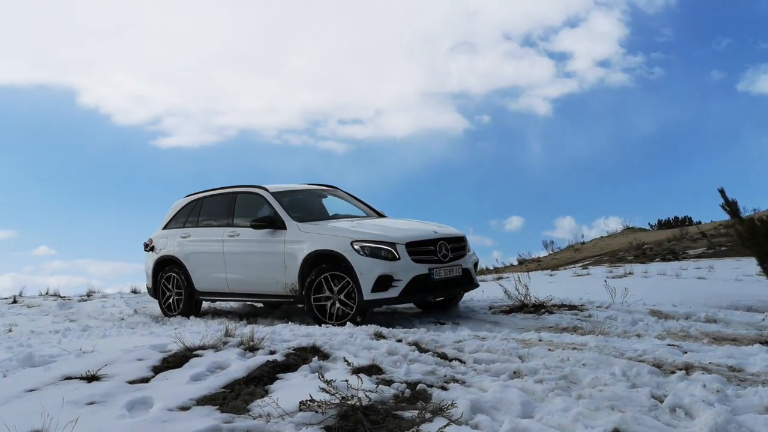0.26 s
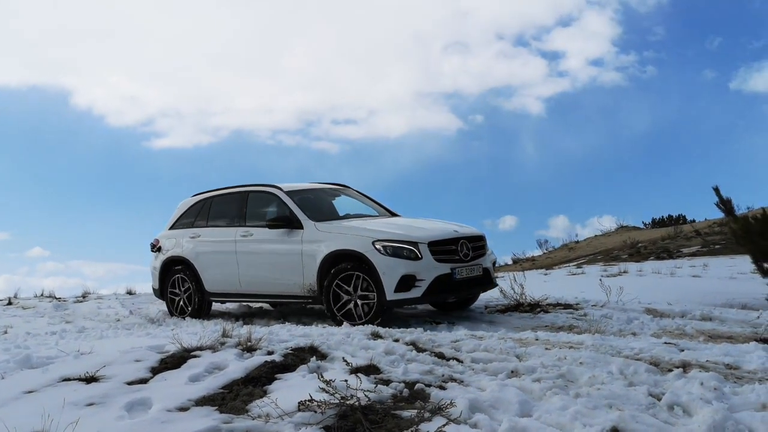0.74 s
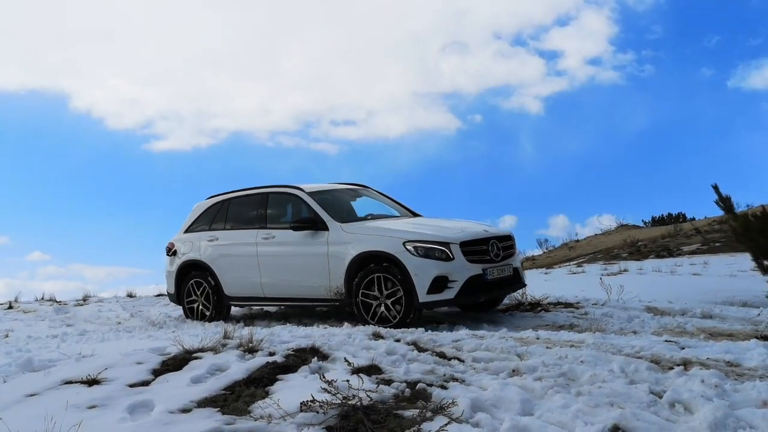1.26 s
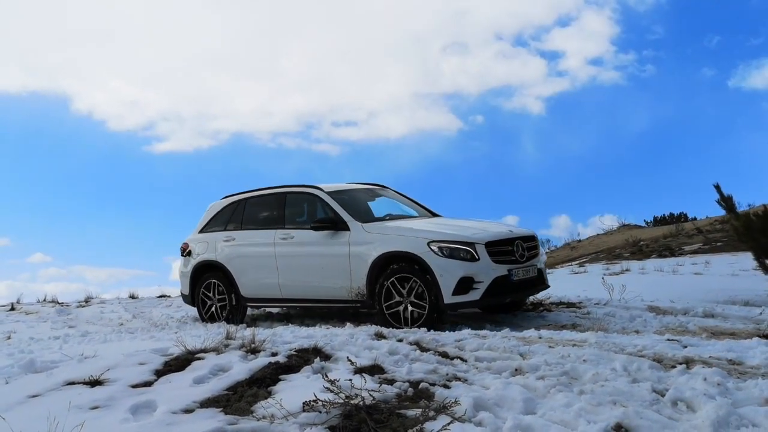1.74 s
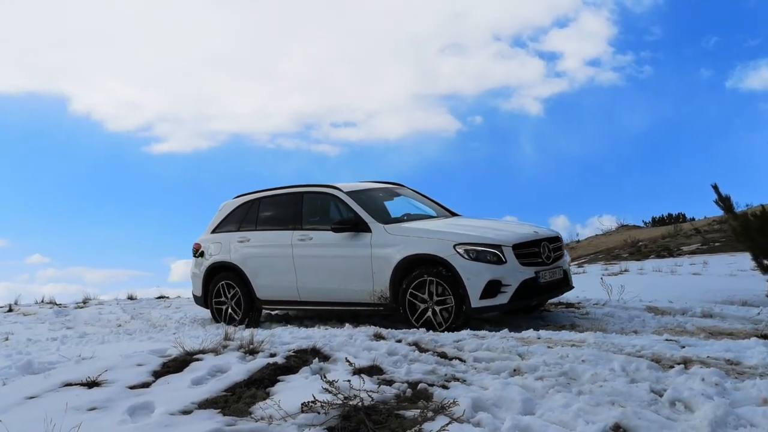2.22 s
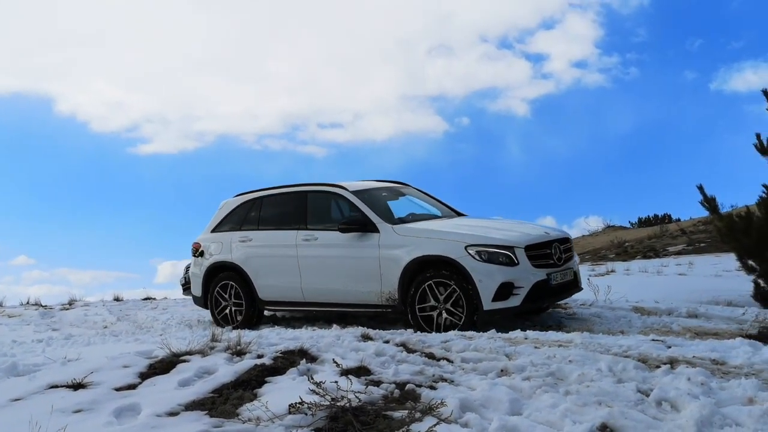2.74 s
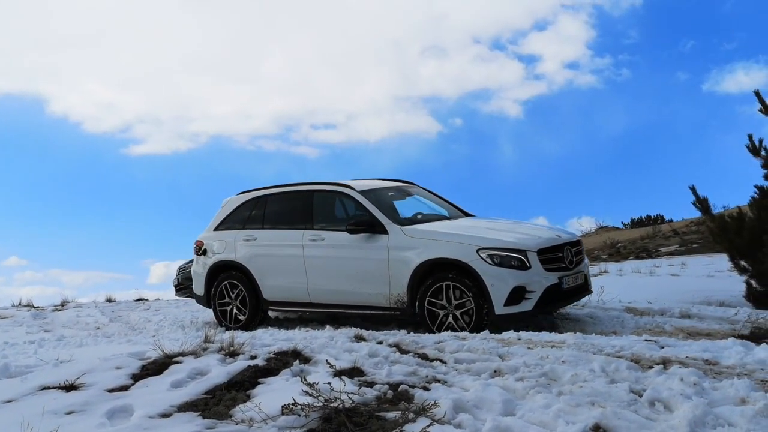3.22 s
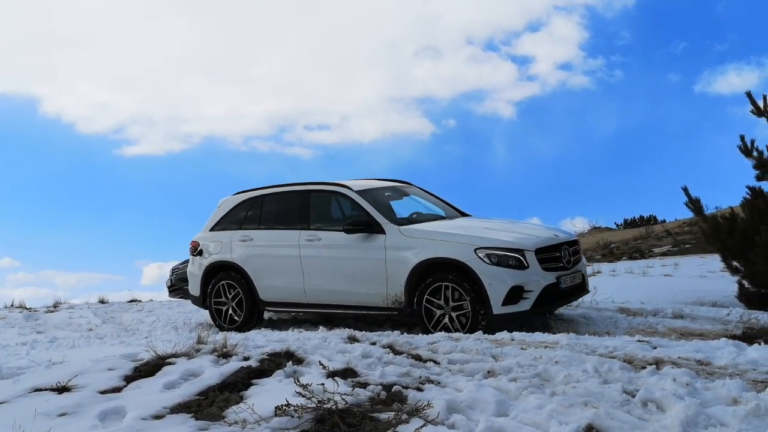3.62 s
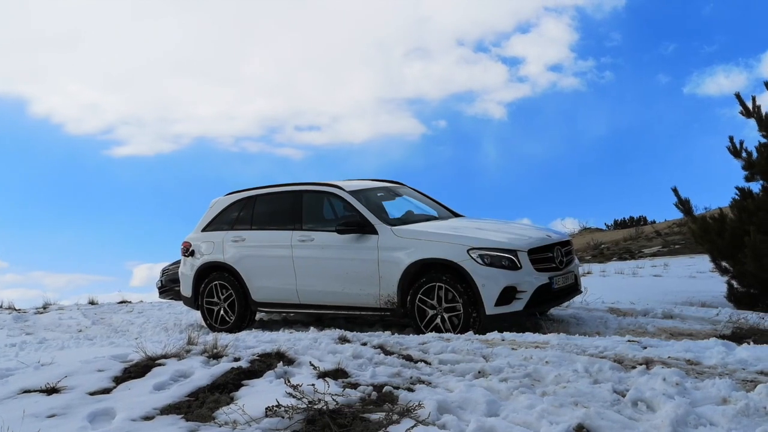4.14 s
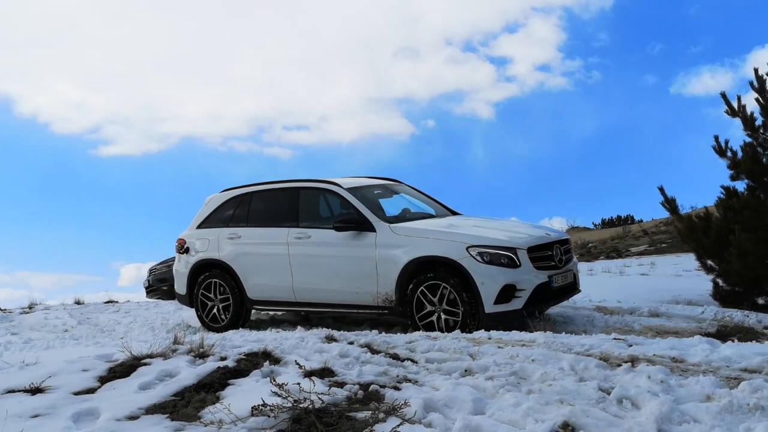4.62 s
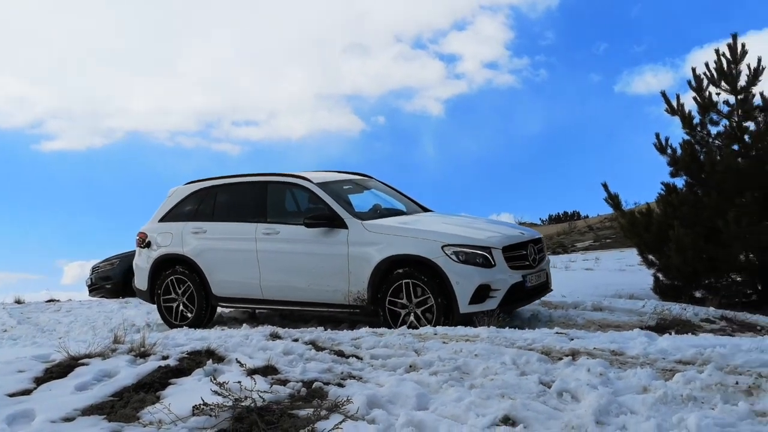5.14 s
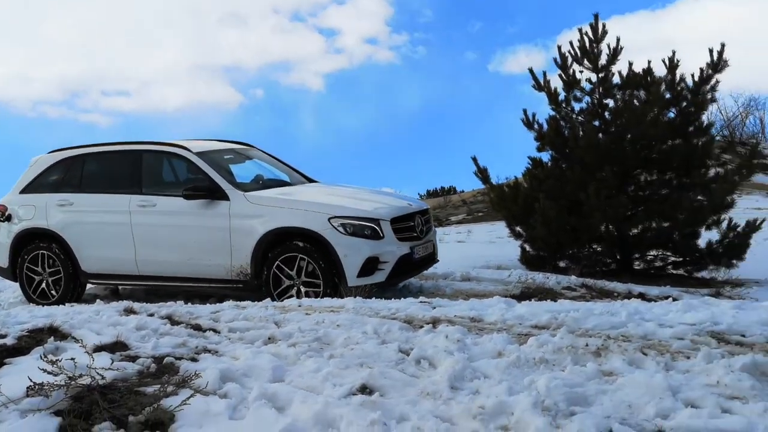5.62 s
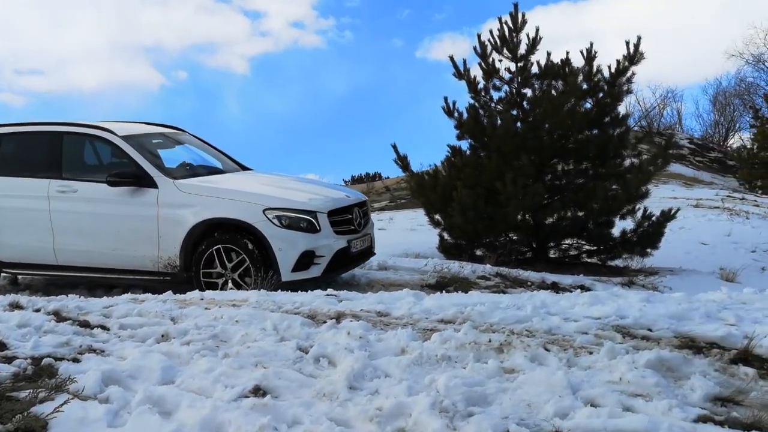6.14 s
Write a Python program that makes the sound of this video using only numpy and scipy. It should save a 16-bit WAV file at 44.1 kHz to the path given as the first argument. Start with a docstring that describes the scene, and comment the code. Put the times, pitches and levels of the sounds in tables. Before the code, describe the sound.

An SUV engine idles with a steady low throb over wet snow, brakes singing faintly high, then surges once with a crunch and labours on.

```python
"""A four-cylinder SUV creeps over wet snow at idle: the exhaust throbs in harmonics of the firing rate and each
firing sends impacts through the resonant engine bay. Snow packs in small collapses with fizz, a few ticks and
dull thumps as it gives way; from about one second to three and a half the dragging brakes sing very high, with
one small squeak. At 4.4 s one short push of the throttle makes the engine surge and the tread crack the crust.
Then the engine labours: dull pushes and thumps, a booming exhaust, clatter of another colour, two late squeals."""
import sys
import numpy as np
from scipy import signal
from scipy.fft import rfft, irfft, next_fast_len
from scipy.io import wavfile
from scipy.ndimage import map_coordinates

SR = 44100
rng = np.random.default_rng(int(sys.argv[2]) if len(sys.argv) > 2 else 0)


def wrap_up_sound(samples):
    """Save the sound to the file named by the first command line argument, as 16-bit audio."""
    columns = np.atleast_2d(samples).T
    # keep every value between -1 and 1, then stretch to whole-number steps
    tamed = np.clip(columns, -1, 1)
    steps = np.round(tamed * 32767).astype(np.int16)
    wavfile.write(sys.argv[1], SR, steps)


N = 280917

# the three modes in which the brake discs sing
DISC_LOW_HZ, DISC_MID_HZ, DISC_HIGH_HZ = 11293, 11610, 14697


def amp(db):
    """Decibels to amplitude ratio."""
    return 10 ** (np.asarray(db) / 20)


def unit(x):
    """Normalise to an rms of 1."""
    return x / np.sqrt(np.mean(x ** 2) + 1e-20)


def along(points, hz):
    """Interpolate (frequency, value) points on a logarithmic frequency axis."""
    f, v = np.transpose(points)
    return np.interp(np.log(hz + 1), np.log(f + 1), v)


def sides(points, hz):
    """Interpolate (frequency, left, right) points on a logarithmic axis, one row per ear."""
    f, *ears = np.transpose(points)
    return np.array([np.interp(np.log(hz + 1), np.log(f + 1), v) for v in ears])


def curves(rows):
    """Interpolate linearly in time: one value per sample for each column after the time."""
    s, *cols = np.transpose(rows)
    return [np.interp(np.arange(N) / SR, s, c) for c in cols]


def wobble(rate):
    """Slow random modulation: a smooth curve through random knots, rate of them a second."""
    knots = rng.standard_normal(int(N * rate / SR) + 4)
    return map_coordinates(knots, [np.arange(N) * rate / SR])


def swell(middle, length, steep):
    """Envelope that rises and falls around a moment; the steeper, the flatter its top."""
    return np.exp(-np.abs(2 * (np.arange(N) / SR - middle) / length) ** steep / 2)


def filtered(x, response):
    """Linear filtering: the spectrum of x times a response of frequency."""
    size = next_fast_len(x.shape[-1] + SR // 4)
    spectrum = rfft(x, size) * response(np.fft.rfftfreq(size, 1 / SR))
    return irfft(spectrum, size)[..., :x.shape[-1]]


def hump(hz, centre, octaves):
    """Gain of one broad resonance, halved at the given octaves from its centre."""
    return 1 / (1 + (np.log2((hz + 1) / centre) / octaves) ** 2)


def add(track, s, sound):
    """Superposition: mix a short sound into a track at time s."""
    part = track[..., round(s * SR):][..., :sound.shape[-1]]
    part += sound[..., :part.shape[-1]]


def together(gains):
    """Energy addition: the level of unrelated sounds heard at once."""
    return np.sqrt(sum(gain ** 2 for gain in gains))


def panned(pan_db):
    """Left and right gains of constant power for a left-minus-right level difference."""
    gains = amp(np.outer([.5, -.5], pan_db))
    return gains / np.sqrt(np.mean(gains ** 2, axis=0))


def spread(pair, colour_db):
    """Interaural correlation: two unrelated signals become coloured stereo with a mid of rms 1."""
    # likeness of the ears, high in the bass and low in the treble: (frequency [Hz], correlation [0-1])
    likeness = [(100, .99), (300, .85), (640, .6), (1500, .8), (3000, .7), (5000, .25), (9000, .1)]

    def angle(hz):
        return np.arccos(np.clip(along(likeness, hz), -1, 1)) / 2

    mid, side = filtered(pair, lambda hz: np.array([np.cos(angle(hz)), np.sin(angle(hz))]))
    ears = np.array([mid + side, mid - side])
    out = filtered(ears, lambda hz: amp(colour_db(hz)))
    return out / np.std(out.mean(axis=0))


def grains(rate, scatter_db):
    """Shot noise: two trains of random impulses of uneven size, rms 1."""
    hit = rng.random((2, N)) < rate / SR
    size = rng.standard_normal((2, N)) * amp(scatter_db * rng.standard_normal((2, N)))
    return unit(hit * size)


def background_hiss(level_db=-81.5):
    """White noise: a steady floor with equal power at all frequencies, unrelated in the two ears."""
    return amp(level_db) * rng.standard_normal((2, N))


def squeak(warble=0.022):
    """Frequency modulation: a faint squeak whose pitch and level waver at random."""
    pitch = 6560 * (1 + warble * wobble(150))  # Hz
    level = amp(-73 + 4.4 * wobble(120.2))
    shape = swell(middle=2.606, length=0.055, steep=6)
    return level * shape * np.sin(2 * np.pi * np.cumsum(pitch) / SR)


def brakes(steep=1.9):
    """Friction-driven oscillation: a dragging pad keeps one disc mode singing, with a quick flutter."""
    # brake squeals, some in quick trills:
    # (middle [s], length [s], disc mode [Hz], level [dB], left minus right [dB])
    squeals = [(.87, .07, DISC_HIGH_HZ, -75, -20), (1.045, .07, DISC_HIGH_HZ, -81, -17),
               (1.117, 0.064, DISC_LOW_HZ, -70.5, -15), (1.21, 0.031, DISC_LOW_HZ, -66, -16),
               (1.244, 0.037, DISC_HIGH_HZ, -57.5, -21), (1.305, 0.018, DISC_HIGH_HZ, -60, -17),
               (1.356, 0.031, DISC_HIGH_HZ, -54.5, -17), (1.419, 0.026, DISC_HIGH_HZ, -61, -16),
               (1.457, 0.029, DISC_HIGH_HZ, -54, -17), (1.515, 0.024, DISC_HIGH_HZ, -48.5, -18),
               (1.576, 0.039, DISC_HIGH_HZ, -55, -10), (1.651, 0.024, DISC_HIGH_HZ, -50.5, -15),
               (1.708, 0.029, DISC_HIGH_HZ, -56, -8), (2.432, 0.046, DISC_HIGH_HZ, -65, -17),
               (2.51, 0.041, DISC_HIGH_HZ, -66, -8), (2.578, 0.037, DISC_HIGH_HZ, -60, -9),
               (2.701, 0.074, DISC_HIGH_HZ, -52.5, -13), (2.92, .2, DISC_HIGH_HZ, -79, -8),
               (3.158, 0.088, DISC_HIGH_HZ, -55, -18), (3.275, 0.05, DISC_HIGH_HZ, -55, -16),
               (3.277, 0.087, DISC_LOW_HZ, -48, 15), (3.373, 0.036, DISC_LOW_HZ, -60, 5),
               (5.305, 0.084, DISC_HIGH_HZ, -62.5, -15), (6.324, 0.056, DISC_MID_HZ, -59.5, -18)]
    drift, flutter_db = .0006, 1.5
    clock = np.cumsum(1 + drift * wobble(50)) / SR
    tones = np.zeros((2, N))
    for s, length, hz, db, pan_db in squeals:
        tone = swell(s, length, steep) * np.sin(2 * np.pi * hz * clock)
        tones += amp(db) * panned(pan_db) * tone
    return np.sqrt(2) * amp(flutter_db * np.minimum(wobble(45), 1)) * tones


def ticks(t60=0.011):
    """Brittle fracture: bits of ice snap, each a short decaying noise burst in one broad resonance."""
    # ice crystals snapping: (time [s], level [dB], centre [Hz], resonance width [octaves])
    snaps = [(.3344, -53, 8500, 0.53), (1.056, -53.5, 7450, 0.49), (1.388, -46.5, 8900, 0.19),
             (6.132, -41, 2553, 0.99)]
    out, t = np.zeros((2, N)), np.arange(SR // 20) / SR
    rise_s, unlike = .0006, .7  # unlike: share of noise that differs between the ears
    envelope = (1 - np.exp(-t / rise_s)) * amp(-60 * t / t60)
    for s, db, centre, octaves in snaps:
        noise = rng.standard_normal(len(t)) + unlike * rng.standard_normal((2, len(t)))
        burst = unit(filtered(noise, lambda hz: hump(hz, centre, octaves) ** 1.4))
        add(out, s, amp(db) * burst * envelope)
    return out * panned(pan_db=-7)


def slush(throttle):
    """Turbulent noise: squeezed wet snow fizzes, harder under throttle, and now and then spurts out."""
    # spurts of slush that build up and break off:
    # (peak time [s], rise time [s], level [dB], left minus right [dB])
    spurts = [(.01, .05, -67, 6), (.335, 0.097, -66.5, 7), (.52, .05, -74, 8), (0.674, 0.29, -70.5, 8),
              (4.345, 0.034, -61, -3), (5.45, 0.36, -69.5, 2), (5.605, 0.1, -58.5, -4.5),
              (6.352, 0.073, -63, -2)]
    # spectrum of the fizz: (frequency [Hz], left level [dB], right level [dB])
    hiss = [(1800, -30, -30), (3300, -9, -11), (4800, -1, -3), (5500, -1, 1), (6500, -3, -3), (8000, -1, 0),
            (9300, -2, 4), (10300, -10, -4), (11500, -17, -17), (15000, -19, -17)]
    release_s = 0.043
    t = np.arange(N) / SR
    # level at closed throttle, and gain at full throttle
    gains = [amp(-81.5 + 12.5 * throttle) * panned(pan_db=7.5)]
    for s, rise, db, pan_db in spurts:
        shape = np.exp(-np.maximum((s - t) / rise, (t - s) / release_s))
        gains.append(amp(db) * panned(pan_db) * shape)
    fizz = rng.standard_normal((2, N)) + 0.37 * grains(rate=2700, scatter_db=5.0)
    return together(gains) * amp(wobble(40)) * spread(fizz, lambda hz: sides(hiss, hz))


def thumps(sag_per_s=5):
    """Short wave packet: a round, crumbling thump swells and fades about its middle while its pitch sinks."""
    # dull thumps: snow giving way, and from 5.4 s heavy pushes of the labouring engine:
    # (middle [s], level [dB], pitch at the middle [Hz], length scale [s])
    packets = [(0.077, -54.5, 380, 0.0099), (.474, -43, 170, .009), (1.207, -37.5, 200, 0.0061),
               (3.11, -52, 221.8, .011), (3.261, -50, 230, 0.0064), (3.309, -44, 175, 0.0054),
               (3.378, -46.5, 224, .012), (3.582, -38, 248, .008), (3.591, -33.5, 180, 0.0076),
               (3.749, -36.5, 166, 0.007), (3.923, -36.5, 132, 0.0078), (4.338, -30.5, 248, 0.0082),
               (4.365, -24, 125, 0.0081), (4.46, -33.5, 206, 0.007), (4.488, -31.5, 72, 0.057),
               (5.443, -35, 136, 0.015), (5.505, -34.5, 90, .008), (5.741, -30, 137, 0.0068),
               (5.803, -30, 75, .022), (6.134, -37, 240, 0.0021)]
    out, t = np.zeros(N), np.arange(-SR // 16, SR // 16) / SR
    crumble = .15
    for s, db, hz, length in packets:
        cycles = np.cumsum(hz * np.exp(-sag_per_s * t)) / SR
        phase = 2 * np.pi * (cycles - cycles[len(t) // 2])
        thump = np.sin(phase) / np.cosh(3.02 * t / length)
        crumbs = unit(filtered(rng.standard_normal(len(t)), lambda f: hump(f, hz, 0.74) ** 2))
        late_crumbs = crumbs / np.cosh(t / length - .5)  # strongest half a length later
        add(out, s + t[0], amp(db) * (thump + crumble * late_crumbs))
    return out


def packing_snow(throttle, steep=2.3):
    """Granular compaction: countless muffled collapses under the tread; ridges add crunch and deep rumble."""
    # ridges of snow that a tyre climbs: (middle [s], length [s], crunch level [dB], rumble level [dB])
    ridges = [(0.31, 0.16, -60.5, -55), (0.605, 0.12, -58.5, -63), (1.227, 0.18, -54.5, -58),
              (2.62, 0.069, -60, -56), (3.17, 0.27, -57, -58), (3.627, 0.073, -59, -43),
              (4.35, 0.085, -45, -40.5), (4.501, 0.13, -44.5, -38), (4.78, 0.15, -68, -47),
              (5.104, 0.28, -53.5, -67), (5.5, 0.37, -53.5, -49), (5.835, 0.28, -63, -42),
              (6.25, 0.17, -51.5, -45.5)]
    # spectrum of the crunch, muffled by the snow: (frequency [Hz], relative level [dB])
    snow_body = [(20, -27), (45, -8), (110, 1), (180, 0.5), (240, -7.5), (320, -19), (450, -41), (900, -59),
                 (2000, -120)]
    # the same columns for the rumble of the rolling tyres
    rumble_body = [(10, -49), (28, -5.5), (85, -10.5), (130, -19.5), (250, -35.5), (700, -99)]
    # level at closed throttle, and gain at full throttle
    packing, heave = [amp(-66 + 22.5 * throttle)], [amp(-63)]
    for s, length, crunch_db, rumble_db in ridges:
        shape = swell(s, length, steep)
        packing.append(shape * amp(crunch_db))
        heave.append(shape * amp(rumble_db))
    collapses = grains(rate=700, scatter_db=0.5)[0]
    crunch = filtered(collapses, lambda hz: amp(along(snow_body, hz)))
    rumble = filtered(rng.standard_normal(N), lambda hz: amp(along(rumble_body, hz)))
    return together(packing) * unit(crunch) + together(heave) * unit(rumble)


def bite(steep=6, pan_db=-3):
    """Brittle fracture: at the push of the throttle the tread breaks the crust in a dense spray of cracks."""
    # spectrum of the cracks: (frequency [Hz], relative level [dB])
    crunch = [(300, -20), (700, -4), (1300, -10), (2100, 7), (3300, -3.5), (4500, -21), (6500, -17.5),
              (9200, -7.5), (10300, -41), (15000, -36)]
    cracks = spread(grains(rate=1000, scatter_db=2), lambda hz: along(crunch, hz))
    return amp(-53.5) * swell(middle=4.44, length=.22, steep=steep) * panned(pan_db) * cracks


def injectors(turns, throttle, level_db=-88.5, throttle_db=15):
    """Gated noise: one fine, high tick at each firing, harder as more fuel goes in."""
    from_firing = (turns + .5) % 1 - .5  # in firing periods
    tick = np.exp(-(from_firing / .06) ** 2) * rng.standard_normal((2, N))
    # (frequency [Hz], relative level [dB])
    colour = [(3000, -25), (6000, -2), (9000, 0), (10500, -16), (15000, -28)]
    return amp(level_db + throttle_db * throttle) * spread(tick, lambda hz: along(colour, hz))


def knocking():
    """Impulsive excitation: a hard firing lifts the clatter at once and the lift dies away exponentially."""
    # firings that knock harder than the rest: (time [s], level over the clatter [dB])
    knocks = [(0.506, 9.5), (4.169, 11), (4.937, 5), (5.095, 7), (6.009, 8)]
    decay_s = 0.0036
    gain, t = np.ones(N), np.arange(SR // 20) / SR
    for s, db in knocks:
        add(gain, s, (amp(db) - 1) * np.exp(-t / decay_s))
    return gain


def bay_db(hz):
    """Modal response: the engine's spectrum with the resonances of its bay, as each ear gets it."""
    # broad engine noise: (frequency [Hz], left level [dB], right level [dB])
    engine_noise = [(103, -1, -1.5), (343, -1.5, -5), (454, -15, -9), (710, -11, -5.5), (1010, -7, -4),
                    (1255, -9.5, -3.5), (1570, 3.5, 2.5), (2110, -10, 1), (2790, -14.5, -2),
                    (3130, -6.5, -14.5), (3730, -20.5, -9.5), (8930, -42.5, -23), (9900, -47, -57),
                    (11200, -44, -34), (14900, -33, -29)]
    # engine bay resonances: (centre [Hz], width [Hz], left lift [dB], right lift [dB])
    resonances = [(752.5, 21, -4, 8.5), (902, 19, 4, 8), (1073, 8.3, 12, 7.5), (1858, 63, -12, 4.5),
                  (2037, 30, -3, 9), (2149, 172, 14, 2), (2386, 14, 11.5, 9.5), (2500, 290, -1, -0.5),
                  (2785, 14, -7, 7.5), (3420, 32, 11.5, 6), (4650, 320, 18.5, -46), (5660, 120, 24, -5),
                  (7540, 700, -14, 9), (9060, 270, -4, 15.5)]
    level_db = sides(engine_noise, hz)
    for centre, width, *lifts in resonances:
        level_db = level_db + np.outer(lifts, 1 / (1 + (2 * (hz - centre) / width) ** 2))
    return level_db


def clatter(turns, throttle, rasp_db=-1, idle_rasp=0.29):
    """Forced vibration: each firing shakes the block and rings the bay, raspy at the grille under throttle."""
    # the grille turns past: (time [s], share of the side-on colour [0-1])
    turn = [(4.8, 0.02), (5.7, 0.82)]
    # change of colour once the grille has turned past: (frequency [Hz], gain [dB])
    side_on = [(500, 0), (800, -6.5), (1130, 1.5), (1500, -5.5), (1850, 5.5), (2200, -9), (3200, -9),
               (5000, 0.5), (10000, -7)]
    past = np.clip(curves(turn)[0], 0, 1)
    throb_db, uneven_db = 5.8, .6
    lead, rise = .33, .33  # in firing periods
    cycle = (turns + lead) % 1
    stroke = np.minimum(cycle / rise, (1 - cycle) / (1 - rise))  # quick rise, slow fall
    beat = unit(amp(throb_db * stroke + uneven_db * (wobble(70) + wobble(18))))
    # valve gear and pistons: a stream of tiny impacts that swells at each firing
    impacts = rng.standard_normal((2, N)) + 0.46 * grains(rate=1500, scatter_db=2.0)
    front = spread(beat * knocking() * impacts, bay_db)
    flank = filtered(front, lambda hz: amp(along(side_on, hz)))
    rasp_gain = idle_rasp + amp(rasp_db) * throttle ** 2
    rasp = rasp_gain * filtered(front, lambda hz: hump(hz, 2320, 0.23))
    level = amp(-63 + 15.5 * throttle)  # closed throttle, and gain at full throttle
    return level * ((1 - past) * (front + rasp) + past * flank)


def labour(turns, push_hz=85, halfway_db=-3.0, ring_hz=170, ring_db=-2.3, ring_t60=0.082, steep=5):
    """Impulse response: under load each firing, and a weaker half-way stroke, sets the exhaust booming."""
    # spells in which the engine labours against the snow: (middle [s], length [s], level [dB])
    spells = [(5.36, .06, -41), (5.468, 0.093, -32), (5.613, 0.16, -35), (5.782, 0.098, -34.5),
              (5.918, 0.033, -34), (6.103, 0.075, -36.5), (6.22, 0.14, -31.5), (6.322, 0.043, -36.5)]
    strength = together(amp(db) * swell(s, length, steep) for s, length, db in spells)
    out, t = np.zeros(N), np.arange(-SR // 50, SR // 12) / SR
    u = (np.pi * push_hz * t) ** 2
    push = (2 * u - 1) * np.exp(-u)
    rise_s, jitter_s, scatter_db, detune = .006, .0012, 2, .09
    after = np.maximum(t, 0)
    boom = amp(ring_db - 60 * after / ring_t60) * (1 - np.exp(-(after / rise_s) ** 2))
    half_turns = np.floor(2 * turns)
    is_stroke = np.diff(half_turns, prepend=0) > 0
    strokes = np.flatnonzero(is_stroke & (strength > strength.max() / 100))
    for i, (late, size, tune) in zip(strokes, rng.standard_normal((len(strokes), 3))):
        db = halfway_db * (half_turns[i] % 2) + scatter_db * size
        ring = boom * np.sin(2 * np.pi * ring_hz * np.exp(detune * tune) * t)
        add(out, i / SR + t[0] + jitter_s * late, strength[i] * amp(db) * (push + ring))
    return out


def exhaust(turns, throttle, flutter_db=0.44):
    """Harmonic series: one soft pressure dip per firing, surging as the throttle opens, sagging as it shuts."""
    # exhaust harmonics: (multiple of the firing rate, relative level [dB])
    harmonics = [(1, -3.5), (2, -6), (3, 2), (4, -9), (5, -37), (6, -23), (7, -30), (8, -49), (9, -34)]
    load_lag_s = 0.37  # the engine's load catches up with the throttle in this time
    keep = np.exp(-1 / (load_lag_s * SR))
    load = throttle[0] + signal.lfilter([1 - keep], [1, -keep], throttle - throttle[0])
    fade_db_per_s = 1.75  # the tailpipe turns away
    throttle_db, surge_db = 4, 15.5  # gain at full throttle; gain per lead of throttle over load
    hum_db = -47 - fade_db_per_s * np.arange(N) / SR + throttle_db * throttle + surge_db * (throttle - load)
    tone = np.zeros(N)
    for k, db in harmonics:
        level = amp(db + flutter_db * np.sqrt(k) * wobble(19))
        tone += level * np.cos(2 * np.pi * k * turns)
    return -np.sqrt(2) * amp(hum_db) * tone


def scene():
    """Superposition of engine, tyres and brakes; the throttle drives both engine and tyres."""
    # engine speed: (time [s], firing rate [1/s])
    speed = [(0.0, 24.43), (0.5, 24.86), (1.2, 25.07), (2.0, 25.12), (3.0, 25.0), (4.0, 25.15),
             (4.25, 26.09), (4.5, 26.2), (4.8, 26.59), (5.1, 24.97), (5.6, 24.85), (6.37, 25.19)]
    # the driver's foot, easing off at first, then one push and a lighter pull: (time [s], throttle [0-1])
    foot = [(0, 0.13), (.4, 0.14), (.9, 0.12), (2.2, 0.05), (4.12, 0.07), (4.33, 0.65), (4.44, 0.95),
            (4.535, 0.63), (4.585, 0.2), (5.3, 0.27), (5.58, 0.61), (6.0, 0.31), (6.37, 0.4)]
    firing_rate, = curves(speed)
    throttle = np.clip(curves(foot)[0], 0, 1)
    turns = np.cumsum(firing_rate) / SR + .44  # in firing periods
    tyres = ticks() + slush(throttle) + packing_snow(throttle) + bite()
    engine = injectors(turns, throttle) + clatter(turns, throttle) + labour(turns) + exhaust(turns, throttle)
    return background_hiss() + squeak() + brakes() + tyres + thumps() + engine


def record(dry):
    """Band limiting: nothing passes above the top frequency."""
    top_hz = 15400
    return filtered(dry, lambda hz: hz < top_hz)


dry = scene()
out = record(dry)
wrap_up_sound(out)
```